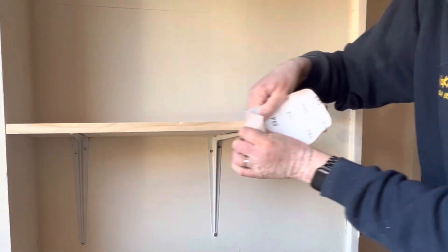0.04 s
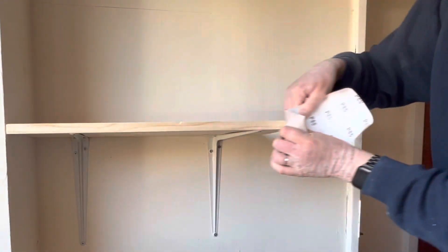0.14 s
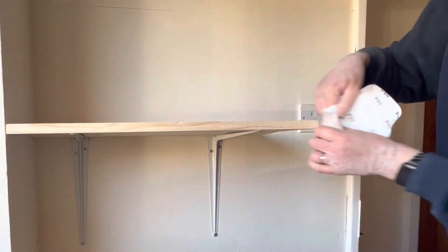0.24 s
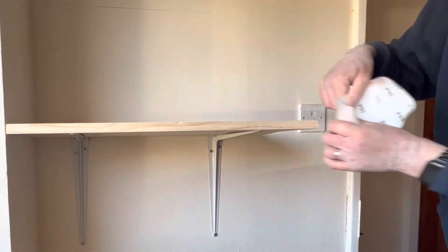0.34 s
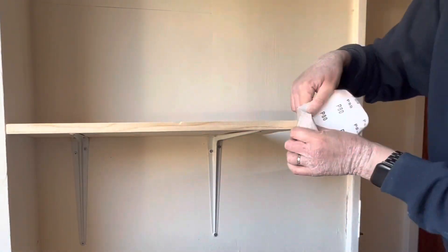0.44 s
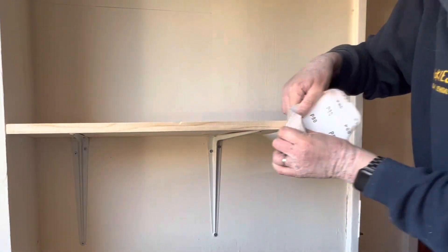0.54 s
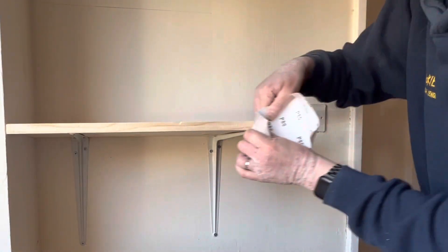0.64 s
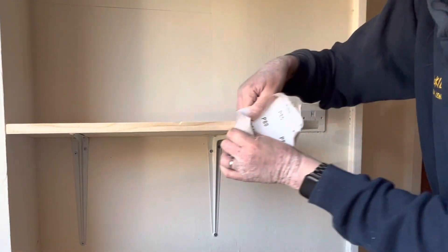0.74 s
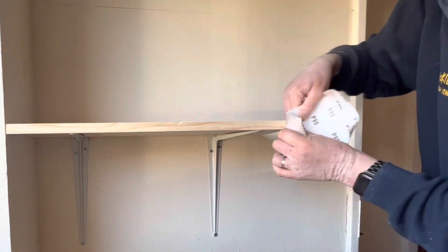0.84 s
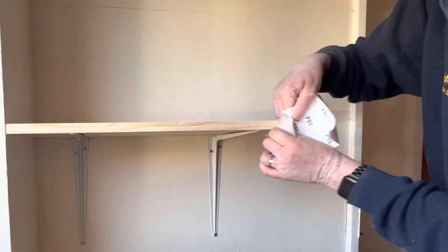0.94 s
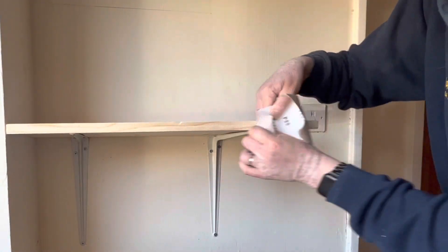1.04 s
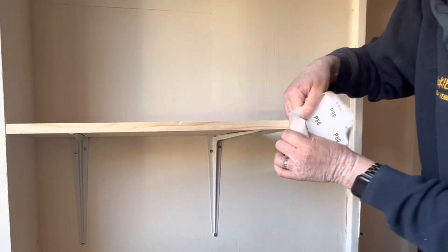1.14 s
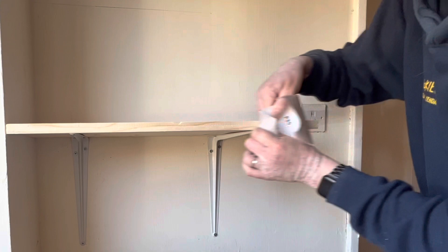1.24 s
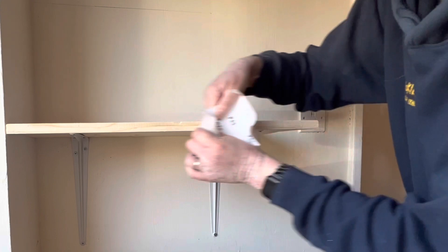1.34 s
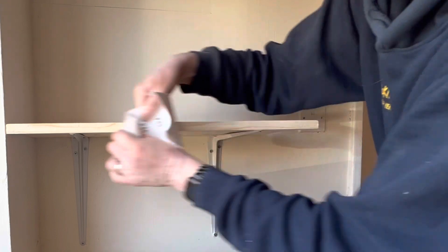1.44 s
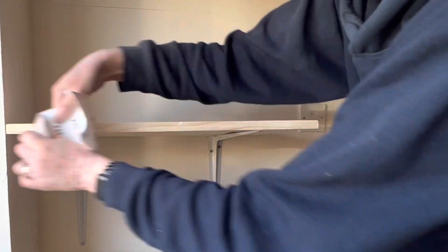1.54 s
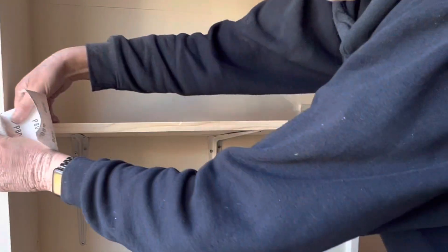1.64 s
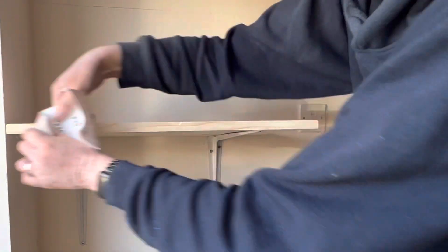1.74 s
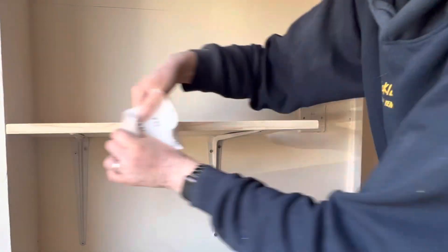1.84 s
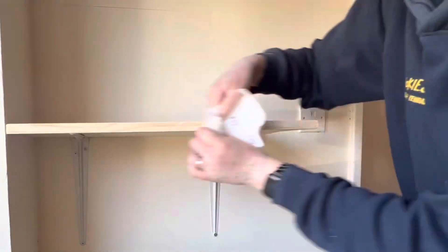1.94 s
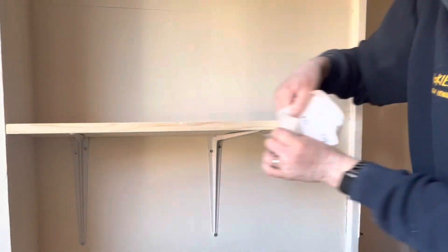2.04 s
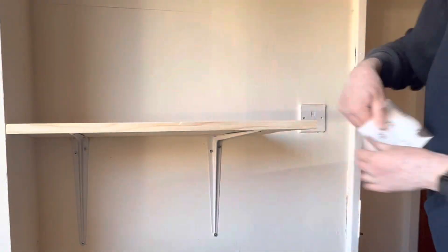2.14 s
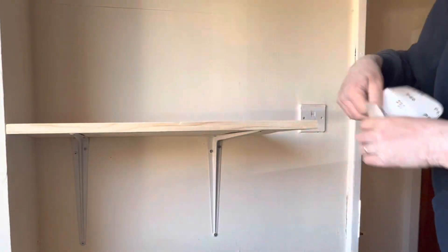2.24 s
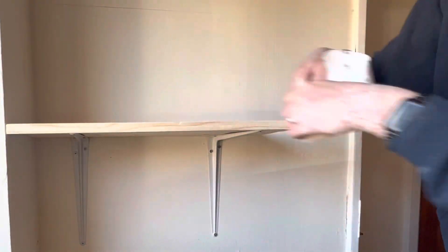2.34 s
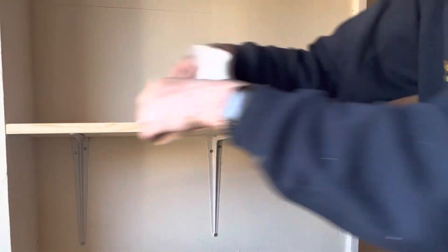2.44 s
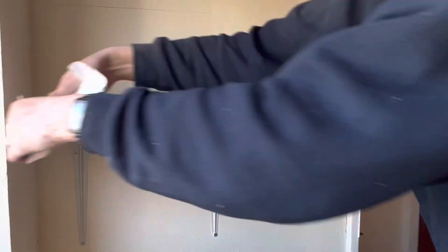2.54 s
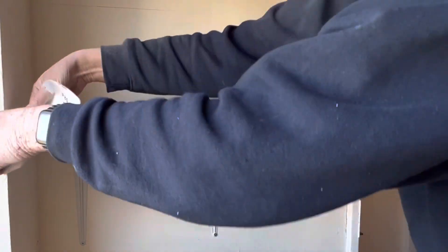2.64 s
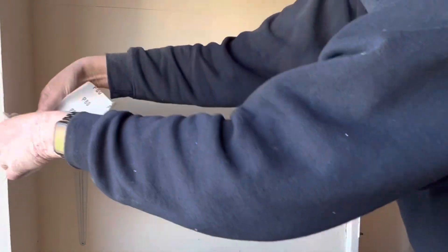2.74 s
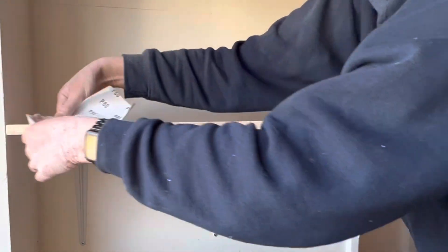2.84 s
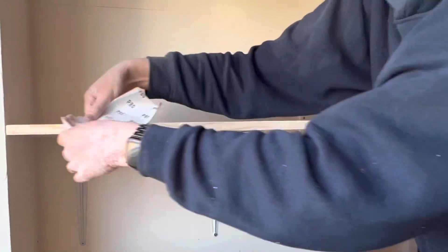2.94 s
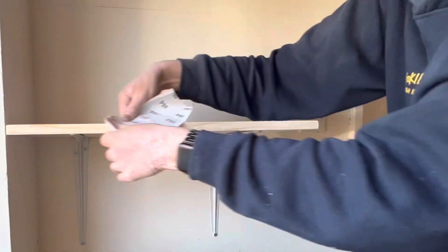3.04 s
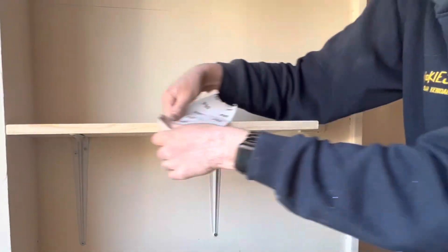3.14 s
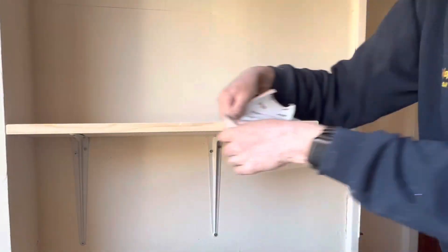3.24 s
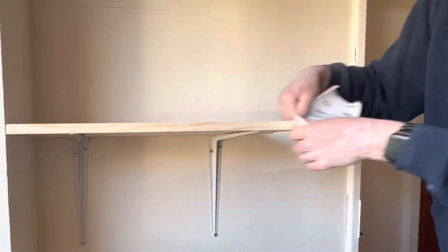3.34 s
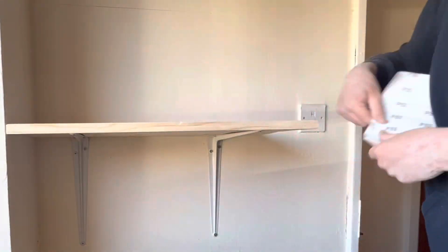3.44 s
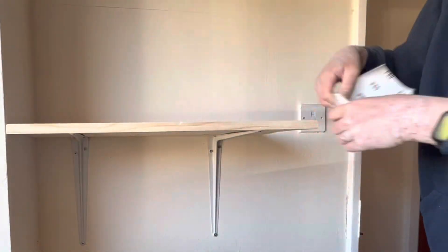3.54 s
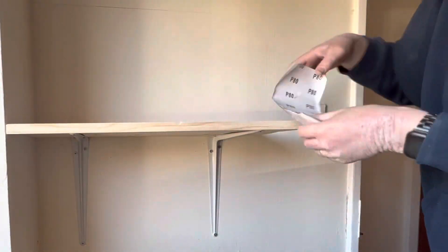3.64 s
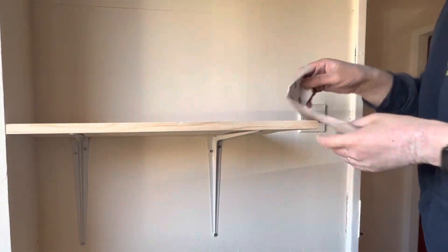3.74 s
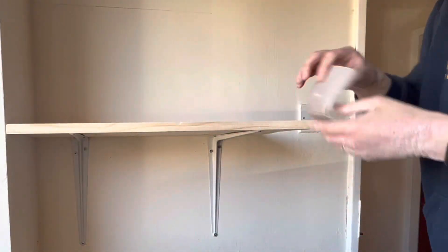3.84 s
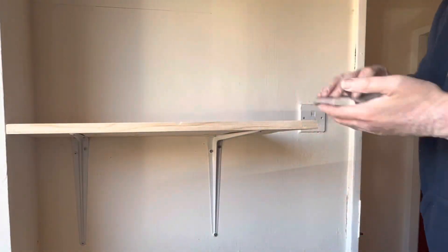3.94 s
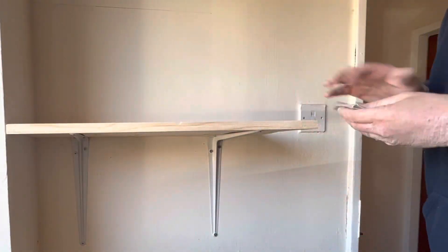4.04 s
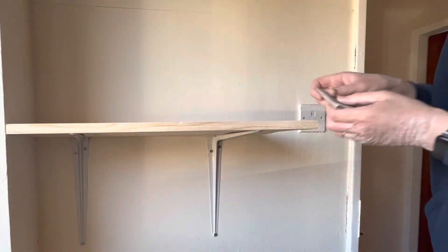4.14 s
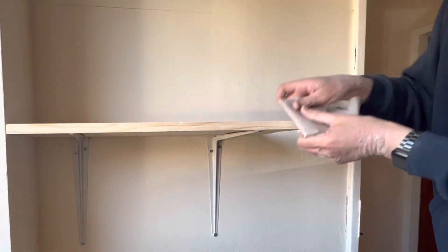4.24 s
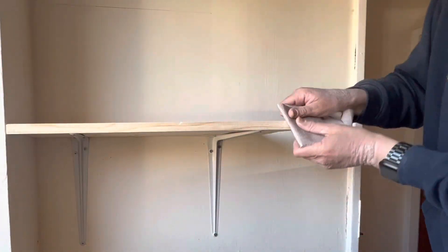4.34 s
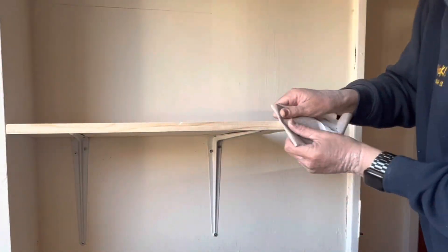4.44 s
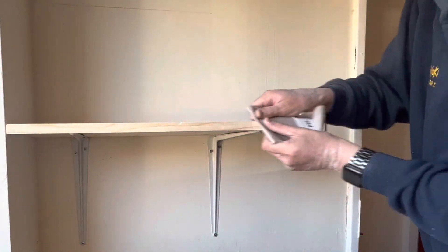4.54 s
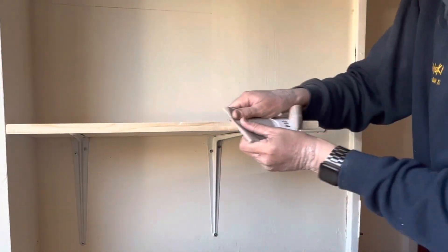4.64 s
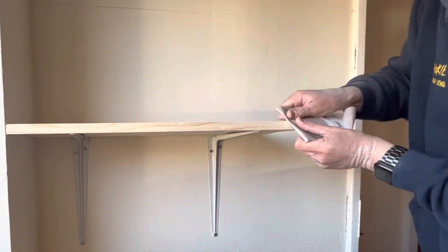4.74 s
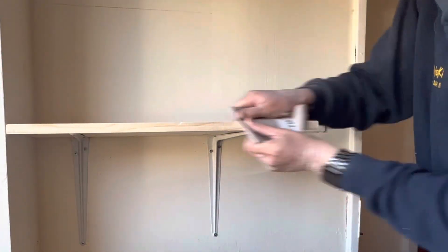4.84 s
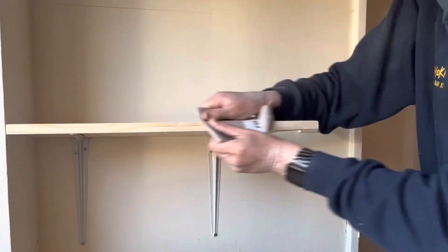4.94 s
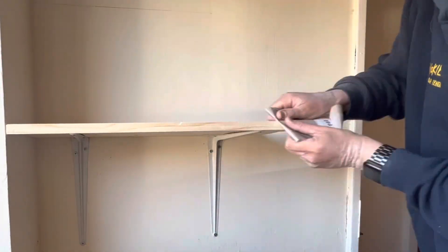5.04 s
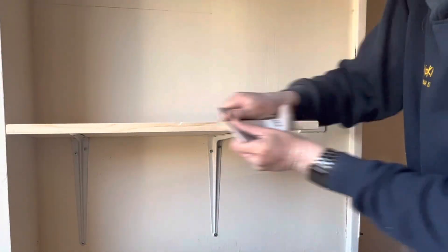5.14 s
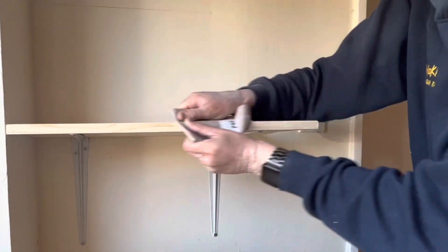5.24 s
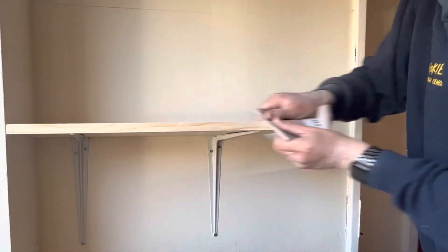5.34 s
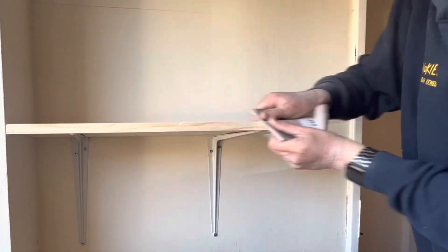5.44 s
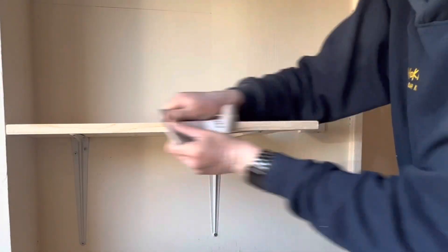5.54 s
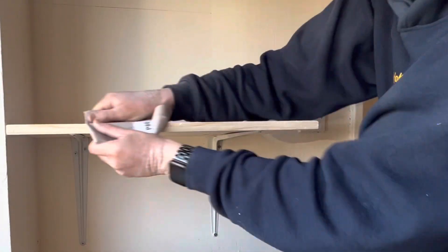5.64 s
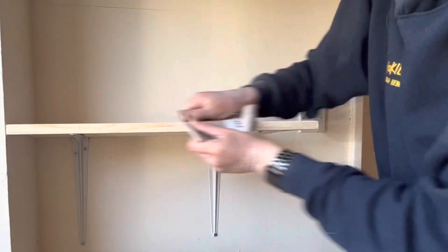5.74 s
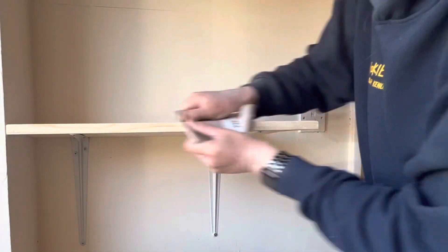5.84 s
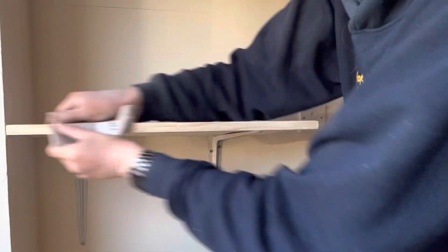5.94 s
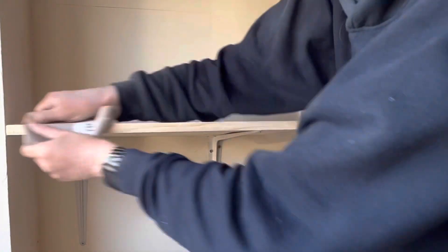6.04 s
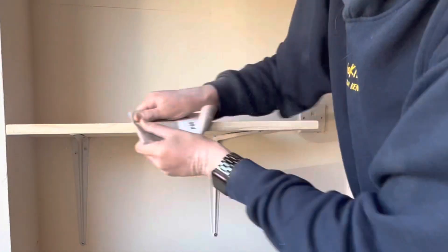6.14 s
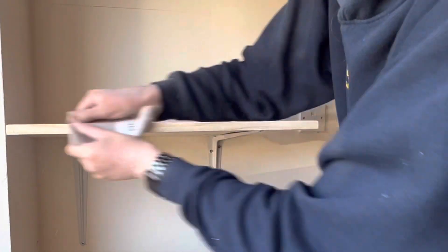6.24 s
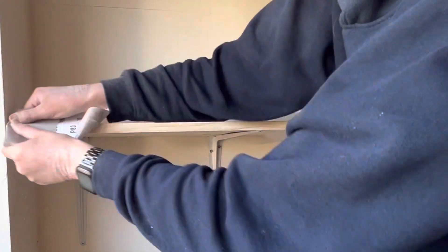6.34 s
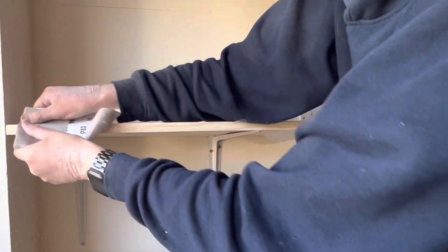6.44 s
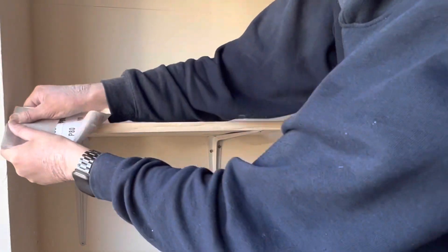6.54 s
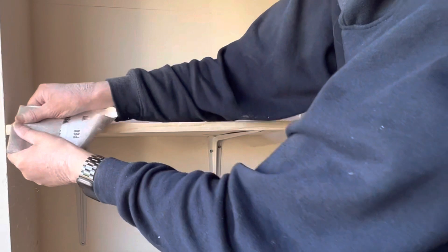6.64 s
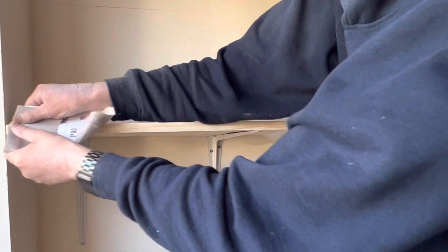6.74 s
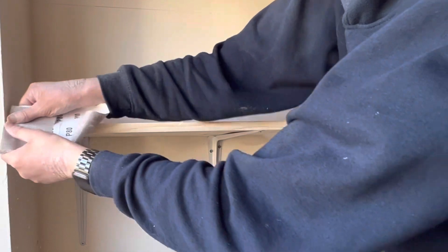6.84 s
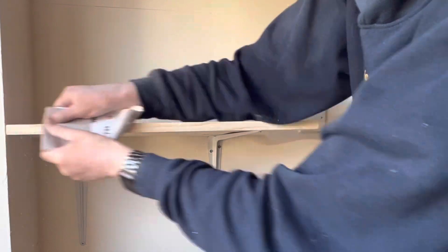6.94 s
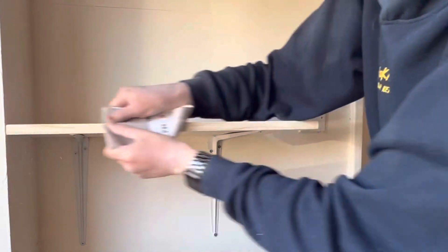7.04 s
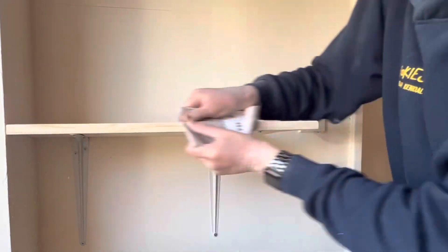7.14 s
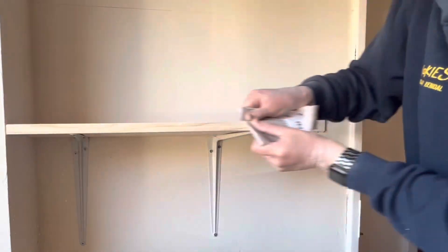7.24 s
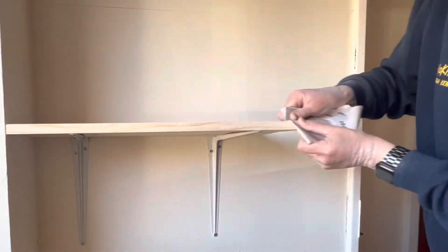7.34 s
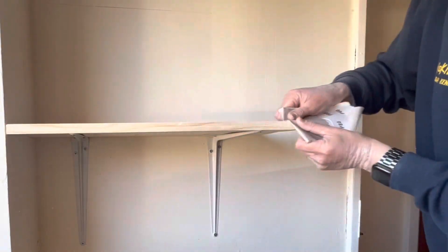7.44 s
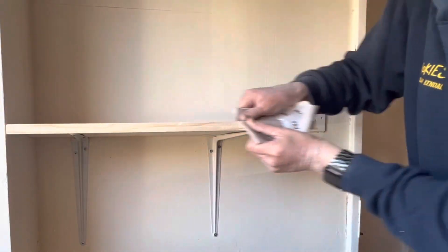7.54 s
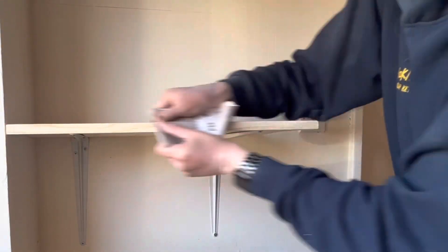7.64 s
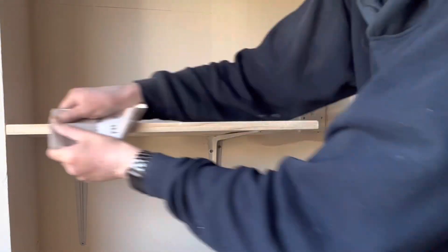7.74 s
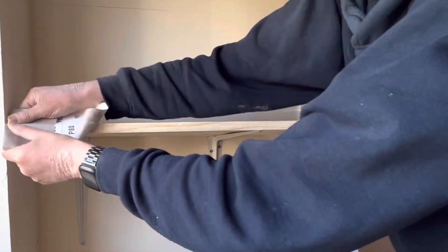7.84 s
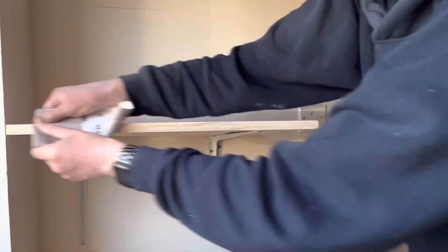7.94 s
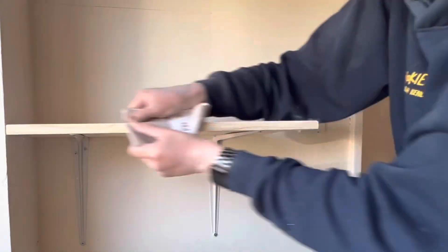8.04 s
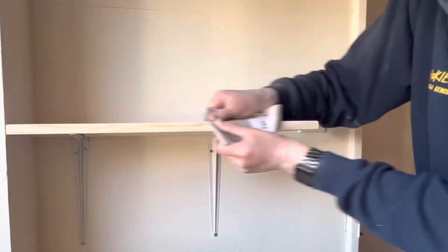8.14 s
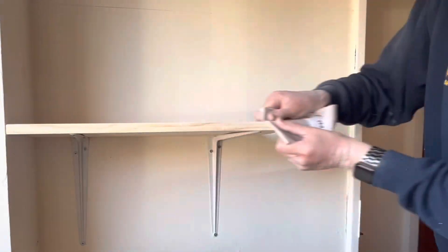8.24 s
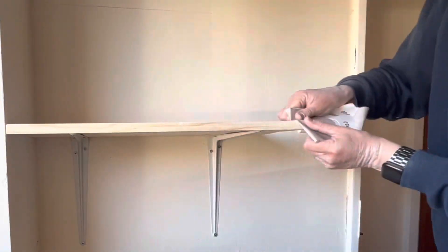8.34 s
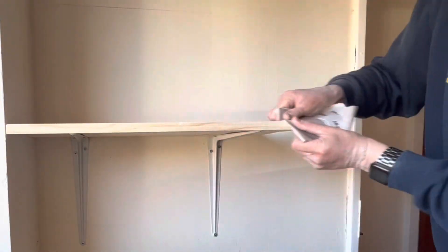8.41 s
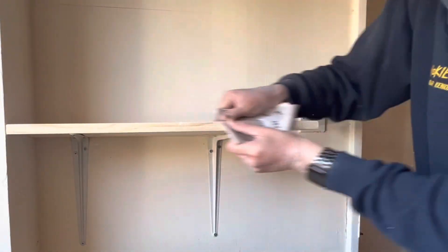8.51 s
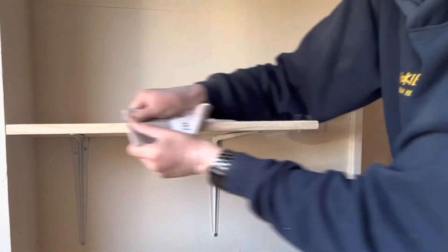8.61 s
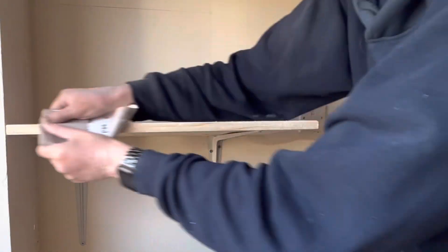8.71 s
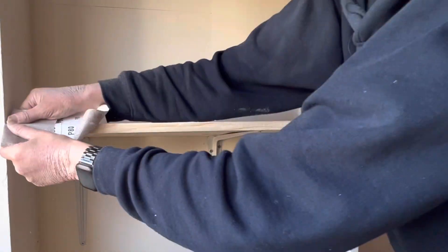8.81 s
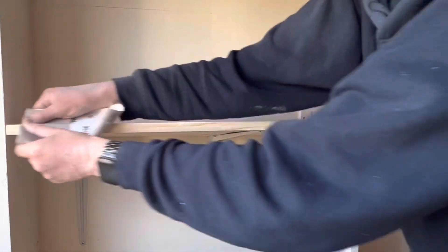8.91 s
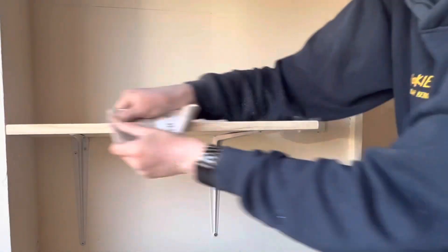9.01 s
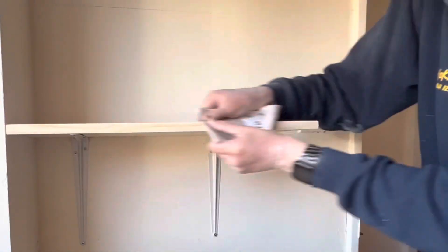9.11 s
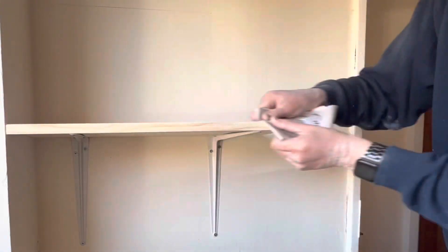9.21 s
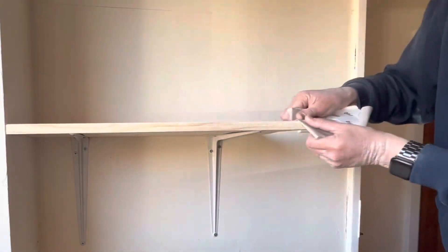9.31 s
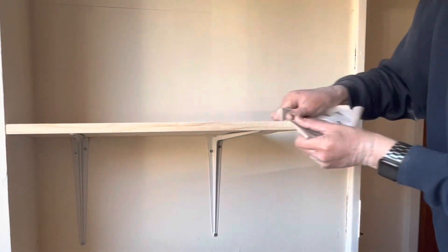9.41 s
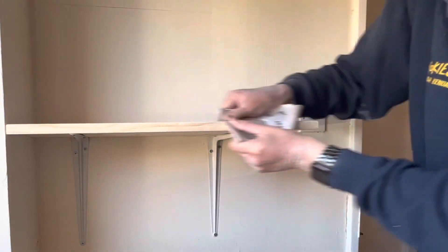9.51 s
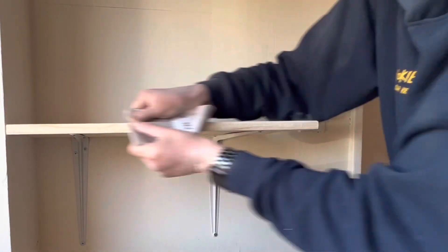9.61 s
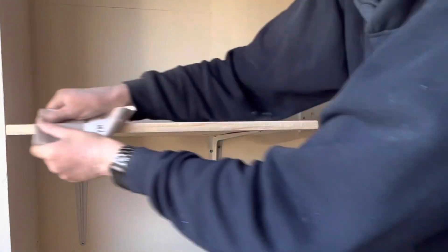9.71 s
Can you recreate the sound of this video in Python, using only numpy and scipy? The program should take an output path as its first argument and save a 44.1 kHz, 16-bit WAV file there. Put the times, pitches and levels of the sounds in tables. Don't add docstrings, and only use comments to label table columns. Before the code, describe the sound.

Coarse sandpaper scrapes wood about a metre from a small stereo microphone. Bright paper hiss rides over a hollow board hum, swelling and dipping with each stroke. Early strokes are uneven, with soft knuckle thuds and sharp paper crackles; around the middle the loose sheet is handled quietly. Rapid short scrubbing resumes, then regular half-second strokes. Faint low rumble and microphone hiss sit underneath in the tight space.

```python
import sys
import numpy as np
from scipy import signal
from scipy.fft import rfft, irfft
from scipy.io import wavfile
from scipy.ndimage import uniform_filter1d

SR = 44100
rng = np.random.default_rng(int(sys.argv[2]) if len(sys.argv) > 2 else 0)


def master(y):
    cut = np.clip(np.atleast_2d(y).T, -1, 1)
    pcm = np.round(cut * 32767)
    wavfile.write(sys.argv[1], SR, pcm.astype(np.int16))


def voltage_ratio(decibels):
    exponent = np.asarray(decibels, float) / 20
    return 10 ** exponent


N = 430857
TIME, FREQ = np.arange(N) / SR, np.arange(N // 2 + 1) * SR / N

# frequency in Hz, level in dB per Hz.
SCRAPE_COLOUR = [(760, -39), (1300, -5.5), (1590, -2.5), (1740, -0.5), (2280, 0.5), (2800, -1),
                 (3180, -0.5), (5500, -8.5), (7150, -16), (12100, -120)]
# frequency in Hz, level in dB per Hz.
HISS_COLOUR = [(2710, -21.5), (4600, -8), (5070, -7.5), (8660, -3.5), (9840, -3), (10700, -3.5),
               (11400, -3.5), (13200, -5), (14700, -6.5), (15600, -14)]
# frequency in Hz, width in Hz, level in dB.
BOARD_LOW_MODES = [(157, 18, -26), (231, 10.4, -11), (258, 10.5, -11.5), (303.7, 21, -3), (340, 25, -0.5),
                   (392.7, 26.3, 6), (503, 14.5, -9.5)]
# frequency in Hz, width in Hz, level in dB.
BOARD_MID_MODES = [(604, 150, -4), (716, 77, -0.5), (837, 35, 1.5), (934, 71, 0), (1039, 45, -2),
                   (1303, 27, -6)]


def unit(x):
    return x / np.sqrt(np.mean(x ** 2))


def along(table):
    hz, value = np.transpose(table)
    return np.interp(np.log(FREQ + 1), np.log(hz), value)


def curves(table):
    s, *columns = np.transpose(table)
    return [np.interp(TIME, s, c) for c in columns]


def colour(x, table):
    return unit(irfft(rfft(x) * voltage_ratio(along(table)), N))


def ring(x, hz, width):
    return signal.lfilter(*signal.iirpeak(hz, hz / width, SR), x)


def walk(rate):
    hold = int(SR / rate)
    steps = np.repeat(rng.standard_normal(N // hold + 1), hold)
    return 0.934 * uniform_filter1d(uniform_filter1d(steps, hold), hold)[:N]


def modes(x, table, wander_db, rate):
    total = 0
    for hz, width, db in table:
        share = voltage_ratio(db + wander_db * walk(rate))
        total = total + share * ring(x, hz, width) / np.sqrt(width)
    return unit(total)


def alcove(x):
    t60_s = 0.077
    t = np.arange(int(.3 * SR)) / SR
    tail = rng.standard_normal((2, len(t))) * voltage_ratio(-60 * t / t60_s) * np.minimum(t / 0.001, 1)
    tail /= np.sqrt(np.sum(tail ** 2, axis=1, keepdims=True))
    return signal.fftconvolve(x * np.ones((2, 1)), tail, axes=1)[:, :N]


def quiet():
    # frequency in Hz, level in dB per Hz.
    quiet_colour = [(30, -18), (88, -31), (150, -10), (389, -17), (683, -19), (2280, -36), (10600, 18),
                    (14400, 15), (15600, -13)]
    return voltage_ratio(-63.5) * colour(rng.standard_normal((2, N)), quiet_colour)


def rumble():
    # time in seconds, level in dB.
    rumble_level = [(0.0, -64), (1.06, -53), (1.14, -67), (2.12, -48), (2.39, -67), (2.75, -45.5),
                    (2.86, -59), (3.9, -58), (4.05, -53), (4.4, -63.5), (5.8, -55.5), (6.96, -62),
                    (7.21, -68.5), (8.9, -59), (9.2, -70), (9.77, -55)]
    # frequency in Hz, width in Hz, level in dB.
    rumble_modes = [(64, 16, -8.5), (106.5, 3.2, -6), (123, 16, -4)]
    shaking = rng.standard_normal((2, N))
    return voltage_ratio(curves(rumble_level)[0]) * modes(shaking, rumble_modes, wander_db=6.0, rate=3.2)


def brackets():
    # start in seconds, high mode in dB, low mode in dB.
    flicks = [
        (.29, -43.5, -57),
        (2.13, -35.5, -51),
        (3.409, -27.5, -37.5),
    ]
    # frequency in Hz, 60 dB decay in seconds.
    steel_modes = [(506, 0.36), (166.7, 0.55)]
    out = 0
    for s, *dbs in flicks:
        t = np.maximum(TIME - s, 0)
        for db, (hz, t60) in zip(dbs, steel_modes):
            swell = 1 - np.exp(-t / 0.022)
            out = out + voltage_ratio(db - 60 * t / t60) * swell * np.sin(2 * np.pi * hz * t)
    return out


def struck(t, table, phase_spread, fade):
    total = 0
    for hz, width, db in table:
        tone = np.sin(2 * np.pi * hz * t + rng.uniform(0, phase_spread))
        total = total + voltage_ratio(db) * tone * np.exp(-t * width * fade)
    return total


def knocks():
    # start in seconds, peak in dB, pitch in Hz, upper modes in dB.
    blows = [(0.257, -25.5, 920, -14), (0.373, -35, 733, 0), (0.445, -26.5, 358, 2), (0.575, -17, 373, -6),
             (0.599, -22.5, 264, -11), (0.933, -18, 351, -3), (0.974, -20, 310, -15), (1.111, -23, 378, -8),
             (2.219, -42, 506, -1), (2.567, -35, 503, 1), (2.644, -26.5, 270, -9), (2.726, -22.5, 404, -2),
             (2.862, -22, 340, -21), (3.405, -23, 357, -2), (3.783, -26, 905, 5.5), (3.815, -27.5, 908, -7),
             (4.014, -43, 1015, 7.5), (4.285, -29, 396, 3), (4.443, -37, 894, -10), (6.026, -25, 313, -12),
             (6.378, -21, 358, -7), (6.431, -32, 367, -17), (6.598, -24, 367, -17),
             (7.403, -31.5, 760, -11), (8.803, -24, 393, -14), (3.319, -24, 880, -6),
             (3.414, -20, 1310, -14), (4.481, -23.5, 350, -9), (2.458, -48, 790, -3), (4.797, -33, 320, -7),
             (5.703, -35, 328, -12), (6.421, -29, 271, -12), (6.506, -31.5, 364, -5),
             (6.667, -38, 393, -10), (6.823, -31, 500, -16), (8.382, -39, 330, -12), (8.951, -32, 398, -12),
             (9.384, -33, 850, -8), (2.783, -31, 332, -10), (4.386, -32, 850, 1)]
    out = np.zeros(N)
    t = np.arange(int(.12 * SR)) / SR
    landing = np.sin(np.pi / 2 * np.minimum(t / 0.0011, 1)) ** 2
    for s, db, hz, mid_db in blows:
        push = np.sin(2 * np.pi * hz * t) * np.exp(-t / 0.0098) * np.minimum(t / 0.0035, 1)
        body = struck(t, BOARD_LOW_MODES, phase_spread=0.97, fade=2.4)
        mids = struck(t, BOARD_MID_MODES, phase_spread=5.6, fade=8.0)
        blow = push + (voltage_ratio(-13.5) * body + voltage_ratio(mid_db) * mids) * landing
        i = int(s * SR)
        out[i:i + len(t)] += voltage_ratio(db - 4.0) * blow
    return out


def snaps():
    # start in seconds, peak in dB, treble in dB, 60 dB decay in seconds, pitch in Hz.
    buckles = [(0.372, -35, -28, 0.072, 2210), (0.442, -32.5, -25, 0.063, 2240),
               (2.1146, -15.5, -8, 0.098, 2000), (2.3145, -41, -15, 0.055, 3250),
               (2.5656, -31.5, -31, 0.042, 3060), (2.6954, -17, 0, 0.074, 3200),
               (2.862, -21, -4.5, 0.059, 3130), (3.407, -13, -3, 0.043, 1760),
               (3.631, -33, 2.5, 0.087, 3400), (3.782, -27, -5, 0.061, 1300),
               (3.844, -29.5, -12, 0.045, 1680), (4.013, -29, 5, 0.033, 3250),
               (4.2833, -27, -9, 0.05, 1780), (4.3836, -25, -29, 0.06, 1340),
               (4.495, -8.5, -13, 0.035, 2200), (6.587, -25, -15, 0.062, 2620),
               (0.92, -26, -15, 0.07, 2320), (1.698, -31, -17, .06, 1300), (2.516, -41, -9, 0.25, 2900),
               (6.43, -33.5, 13, 0.044, 2870), (6.886, -28, -1, 0.057, 2200),
               (7.402, -38, -13, 0.046, 1000), (8.945, -23.5, 2.5, 0.12, 2280),
               (9.385, -32.5, 12.5, 0.038, 2300), (3.5426, -42, -3, .04, 3680),
               (3.6125, -32, -3, 0.045, 3380), (3.7082, -45, -5, 0.04, 4830),
               (3.7282, -41, -3, 0.035, 4840), (3.9327, -34, -5, .04, 2550), (4.0624, -30, -2, 0.047, 4840),
               (4.1497, -36, 3, .05, 2580), (2.722, -21.5, -10, 0.068, 1450), (3.316, -19.5, 0, .05, 2000),
               (6.98, -16, -6, 0.044, 1950)]
    crackle = rng.standard_normal((2, N))
    low, high = colour(crackle, SCRAPE_COLOUR), colour(crackle, HISS_COLOUR)
    out = np.zeros((2, N))
    t = np.arange(int(.2 * SR)) / SR
    for s, db, treble_db, t60, hz in buckles:
        now = slice(int(s * SR), int(s * SR) + len(t))
        burst = voltage_ratio(db - 4.0) * np.minimum(t / 0.0024, 1) * voltage_ratio(-60 * t / np.clip(t60, .01, .2))
        fold = voltage_ratio(6.0) * ring(low[:, now], hz, width=210)
        out[:, now] += burst * (low[:, now] + fold + voltage_ratio(treble_db) * high[:, now])
    return out


def effort():
    # start in seconds, level at the turn in dB, peak in dB,
    # swell over the stroke in dB, roundness (a power of the pace).
    full_strokes = [(1.166, -54.5, -27.5, -2.5, 0.37), (6.874, -49.5, -28, -2, 0.34),
                    (7.42, -48, -27.5, -3, 0.55), (7.88, -50, -29.5, 1.5, 0.4),
                    (8.359, -48.5, -28.5, -0.5, 0.53), (8.86, -49.5, -31, -2.5, 0.41),
                    (9.358, -51, -30, -2.5, 0.5)]
    run_offs = [
        (-0.2, -44, -30.5, -6.5, 0.14),
        (1.675, -57, -27, 1.5, 0.25),
        (2.693, -42.5, -32.5, 7, 0.41),
    ]
    scrubs = [(0.516, -55, -31, -1, 0.4), (0.755, -51, -32, -6, 0.83), (0.906, -54, -34.5, 30, 1.26),
              (1.051, -44, -35.5, -6, 0.73), (4.24, -50.5, -42.5, 35, 1.5), (4.357, -44.5, -46, 13, 1.8),
              (4.426, -43, -31.5, 9, 0.28), (4.648, -41.5, -31, 5, 0.91), (4.787, -41.5, -30, -6, 0.8),
              (4.953, -35, -33.5, -1, 1.1), (5.088, -41.5, -31, 0, 1.1), (5.252, -41, -32.5, -1, 0.82),
              (5.422, -46.5, -32, -1, 0.63), (5.665, -40, -37, 5.5, 0.61),
              (5.822, -44.5, -33.5, -4.5, 0.46), (6.038, -41, -34, 4, 0.75),
              (6.187, -42, -32.5, -3.5, 0.67), (6.403, -46.5, -36.5, -2, 1.96), (6.49, -46, -38, 12, 0.77),
              (6.58, -47.5, -39.5, -21, 1.03), (6.656, -48.5, -39.5, -8, 1.1), (6.735, -51, -38, -3, 1.7),
              (6.81, -51.5, -38, 7, 0.83)]
    handling = [(0.267, -59, -81, 25, 1.45), (0.423, -67.5, -62, -29, 1.8), (2.123, -59, -68, -18, 0.43),
                (2.263, -57.5, -58, -19, 3.7), (2.382, -72, -58, 27, 1), (3.407, -60, -72, -3, 2.0),
                (3.502, -60, -57.5, 23, 0.8), (3.58, -53, -50, -6, 2.2), (3.68, -57, -49, 0, 0.48),
                (3.807, -47.5, -47, -4, 0.59), (3.906, -48, -54, -15, 0.81), (3.979, -50.5, -51, -7, 0.54),
                (4.123, -47, -42.5, -9, 2.2)]
    settling = [
        (2.623, -66.5, -44.5, -3, 0.72),
        (7.395, -51, -67, -2, 1),
        (8.837, -59, -79, 0, 1),
    ]
    last_turn_s, last_turn_db = 9.85, -42
    stick = 0.13
    catch_s, flutter_db_per_s = 0.055, 469
    out, pace, catch, air = np.zeros((4, N))
    rows = [(*row, 1) for row in full_strokes + settling + scrubs + handling]
    rows = sorted(rows + [(*row, .5) for row in run_offs])
    turns = [row[:2] for row in rows[1:]] + [(last_turn_s, last_turn_db)]
    lifted = [row[0] for row in handling]
    for (s, turn_db, db, swell_db, roundness, swing), (end, end_db) in zip(rows, turns):
        now = (TIME >= s) & (TIME < end)
        done = (TIME[now] - s) / (end - s)
        held = stick * swing
        pace[now] = np.clip((np.sin(np.pi * swing * done) - held) / (1 - held), 0, 1)
        out[now] += voltage_ratio(db + swell_db * (done - .5)) * pace[now] ** roundness
        out[now] += voltage_ratio(turn_db + (end_db - turn_db) * done)
        air[now] = s in lifted
        catch[now] = np.exp(-(TIME[now] - s) / catch_s) * (1 - air[now])
        if swing < 1:
            flutter_db = -flutter_db_per_s * np.maximum(TIME - end, 0)
            out += (TIME >= end) * voltage_ratio(db + swell_db / 2 + flutter_db)
    return out, *uniform_filter1d(np.array([pace, catch, air]), size=1500)


def grit(scatter_db, judder_db):
    size = voltage_ratio(scatter_db * rng.exponential(size=N) + judder_db * walk(70))
    return unit(size * rng.standard_normal((2, N)))


def board_hum(speed, coast, pace, catch, air, weight_db, free_db, slack_db):
    wall_end_times = [1.66, 2.68, 6.78, 7.8, 8.78, 9.72]
    wall_end = sum(np.exp(-((TIME - s) / 0.075) ** 2) for s in wall_end_times)
    drone_db = -8 + weight_db - 4 * pace + 7.5 * catch - 0.5 * air + 3.5 * wall_end
    mid_db = -6 + 0.79 * weight_db - 4.5 * pace - free_db + 3.75 * catch + 6.5 * air + wall_end
    push = grit(scatter_db=1.5, judder_db=3.0)
    drone = modes(push, BOARD_LOW_MODES, wander_db=3.5, rate=5.6)
    drone = voltage_ratio(drone_db) * drone * (0.57 * speed + 0.4 * coast)
    mids = modes(push, BOARD_MID_MODES, wander_db=3.0, rate=9)
    mids = voltage_ratio(mid_db) * mids * (0.79 * speed + 0.11 * coast)
    mids = mids + (voltage_ratio(0.97 * slack_db) - 1) * ring(mids, 1145, 480)
    return drone + mids


def back_wall(x, gain):
    lag_s = .0016 + .0009 * walk(2.5)
    return np.array([c + gain * np.interp(TIME - lag_s, TIME, c) for c in x])


def slide(x):
    place = TIME + .0007 * walk(3)
    return np.array([np.interp(place, TIME, c) for c in x])


def patchy(x, depth_db):
    centres = 1500 * 1.3 ** np.arange(9)
    return x + sum((voltage_ratio(depth_db * walk(13)) - 1) * ring(x, hz, hz / 4) for hz in centres)


def moving_alcove(x):
    trips_per_s = 2.1
    place = 2.26 * walk(3.5) + 2 * np.pi * trips_per_s * TIME
    return alcove(x * np.cos(place)) + alcove(x * np.sin(place))


def paper_scrape(speed, coast, pace, air, taut_db, slack_db):
    # frequency in Hz, width in Hz, level over the scrape in dB.
    edge_modes = [(1688, 52, -0.5), (1904, 26, -4), (2256, 26, -6), (2696, 42, -6), (3000, 45, -9),
                  (3170, 46, -29), (3870, 25, -6)]
    ticks = grit(scatter_db=1.0, judder_db=-0.35)
    scrape = unit(back_wall(colour(ticks, SCRAPE_COLOUR), gain=0.15))
    scrape = scrape + (voltage_ratio(slack_db) - 1) * ring(scrape, 1450, 640)
    edge = slide(modes(scrape, edge_modes, wander_db=5.0, rate=5.4))
    hiss_db = taut_db + 4 * pace
    hiss = voltage_ratio(hiss_db + 2.25 * walk(25)) * colour(ticks, HISS_COLOUR)
    rustle_db = 0.66 + 2.9 * np.clip(1 - coast / voltage_ratio(-35.0), 0, 1)
    speed = speed * voltage_ratio(3 * air * walk(90))
    paper = speed * patchy(unit(scrape + voltage_ratio(-8.5) * edge) + hiss, rustle_db)
    return paper + voltage_ratio(-8.0) * moving_alcove(paper)


def sanding():
    # time in seconds, tautness of the sheet in dB, weight on the board in dB,
    # nearness to the free end in dB, left minus right in dB, slack paper in dB.
    grip = [(0, -4, -3, -2, 4, 5.5), (.55, -4.5, 3.5, 2, 5, 4), (1.1, -3, 2.5, 2.5, 5, 2.5),
            (1.4, -3.5, 0.5, 2.5, 5.5, -1.5), (2.1, -4, -1, 0.5, 5.5, 1.5),
            (2.65, -4.5, 5.5, -0.5, 5, -1.5), (3.2, -5, -0.5, -1, 6, -1), (3.6, -1, 3, 0, 3.5, 0),
            (3.8, -3.5, 7.5, 7.5, 4, -6), (4.25, -2.5, 0.5, 0, 4, -2.5), (4.5, -9, 3.5, -8, 3.5, 0),
            (4.7, -3.5, -5, -0.5, 5.5, 0.1), (5.2, 2.5, -3.5, -3.5, 5, -2), (5.95, 2, -5, -1, 5.5, -4.5),
            (6.3, -3, -1, 0.5, 4.5, -3.5), (6.75, -7, 4.5, -1, 6, -2), (7.1, -2.5, -4.5, -2.5, 5, -4),
            (9.77, -0.5, -2.5, -0.5, 5, -1.5)]
    speed, pace, catch, air = effort()
    taut_db, weight_db, free_db, pan_db, slack_db = curves(grip)
    coast = signal.lfilter([.0012], [1, .0012 - 1], speed)
    board = board_hum(speed, coast, pace, catch, air, weight_db, free_db, slack_db)
    paper = paper_scrape(speed, coast, pace, air, taut_db, slack_db)
    return board, paper, pan_db - np.mean(pan_db)


def ports(x):
    # frequency in Hz, likeness of the ports from 0 to 1.
    likeness = [(40, .85), (100, .99), (350, .975), (700, .76), (1200, .62), (2500, .4), (5000, .12),
                (12000, .08)]
    # frequency in Hz, lead of the left port in radians.
    left_lead = [(40, 0), (150, -.08), (420, -.3), (700, -1.6), (1030, .8), (1550, 1.6), (2670, 1.4),
                 (4000, 1.3)]
    # frequency in Hz, left minus right in dB.
    left_tilt = [(200, 0), (380, 1), (700, -4.5), (1290, 1), (2380, 1), (6000, .5), (8500, 7.5), (14000, 5)]
    left, other = rfft(x)
    like = np.clip(along(likeness), 0, 1)
    right = like * left * np.exp(-1j * along(left_lead)) + np.sqrt(1 - like ** 2) * other
    half_tilt_db = along(left_tilt) / 2
    return irfft(np.array([left * voltage_ratio(half_tilt_db), right * voltage_ratio(-half_tilt_db)]), N)


def scene():
    board, paper, pan_db = sanding()
    hits = knocks() + snaps()
    hits = hits + voltage_ratio(-6) * alcove(hits) + brackets()
    panned_paper = ports(paper) * voltage_ratio(np.array([pan_db, -pan_db]) / 2)
    return ports(board + hits + rumble() + quiet()) + panned_paper


def low_pass(x):
    return signal.sosfilt(signal.butter(12, 15870, fs=SR, output="sos"), x)


def record(dry):
    # frequency in Hz, width in Hz, depth
    # in dB.
    nulls = [(1210, 60, -4), (1590, 55, -4), (2125, 60, -3.5), (2480, 70, -2), (4100, 170, -4.5)]
    dip = voltage_ratio(-9 * np.exp(-((FREQ - 10700) / 230) ** 4))
    notch = voltage_ratio(sum(db * np.exp(-((FREQ - hz) / width) ** 2) for hz, width, db in nulls))
    bass_cut = 1 / np.sqrt(1 + (88 / (FREQ + 1)) ** 8) + voltage_ratio(-38.0)
    top_cut = voltage_ratio(-8 / (1 + np.exp((14900 - FREQ) / 60)))
    rounded = np.tanh(1.3 * dry) / 1.3
    mix = irfft(rfft(rounded) * dip * notch * bass_cut * top_cut, N)
    return low_pass(mix)


dry = scene()
out = record(dry)
master(out)
```